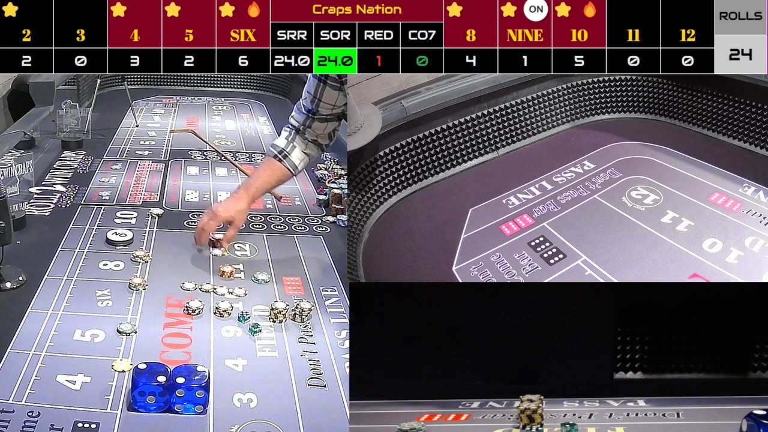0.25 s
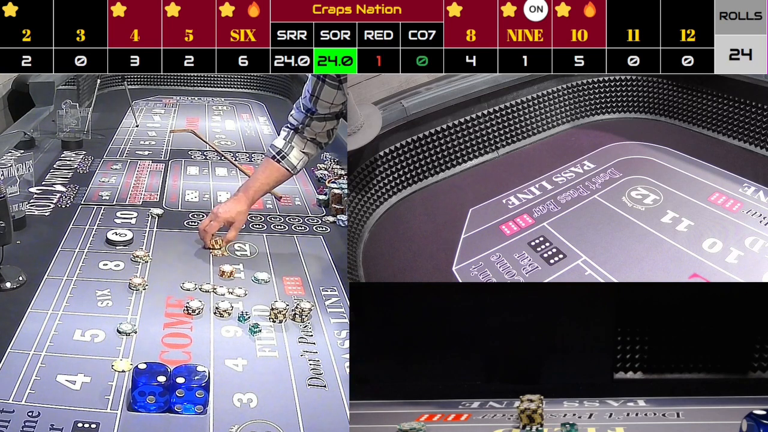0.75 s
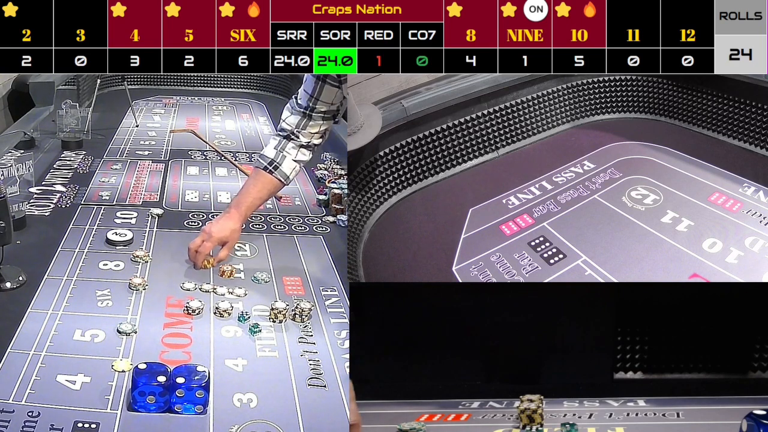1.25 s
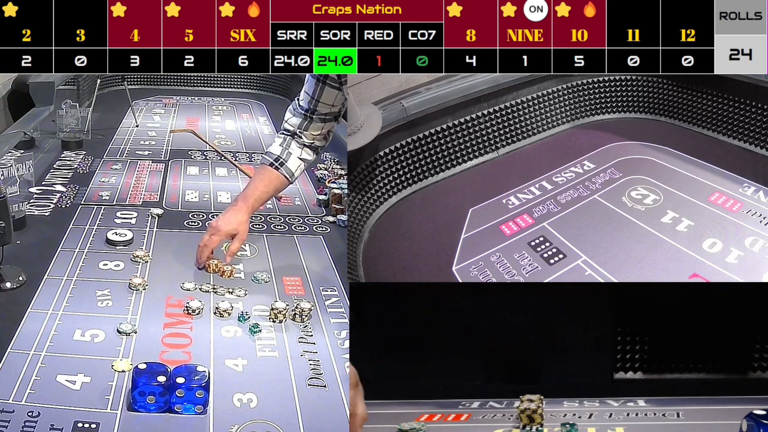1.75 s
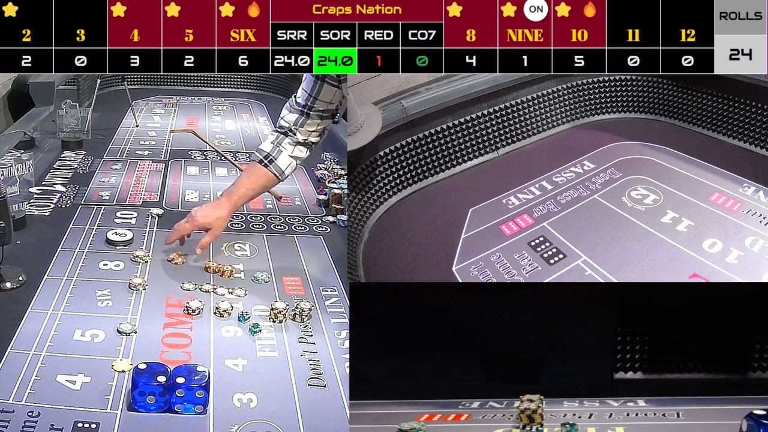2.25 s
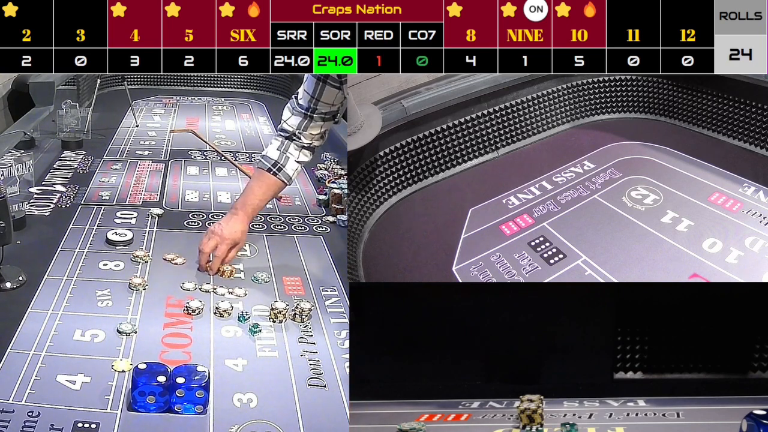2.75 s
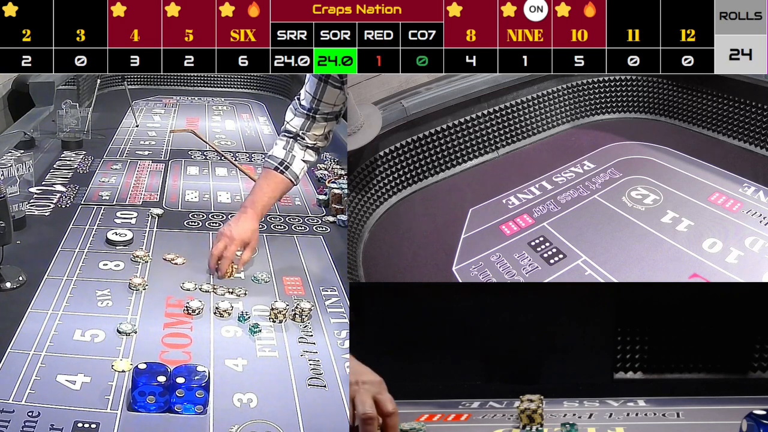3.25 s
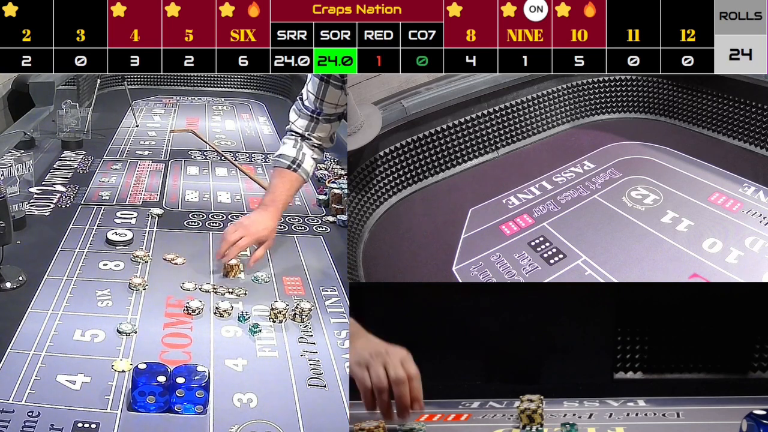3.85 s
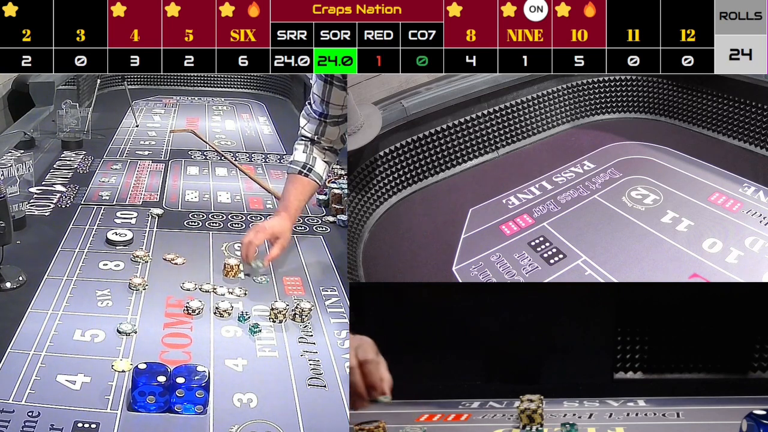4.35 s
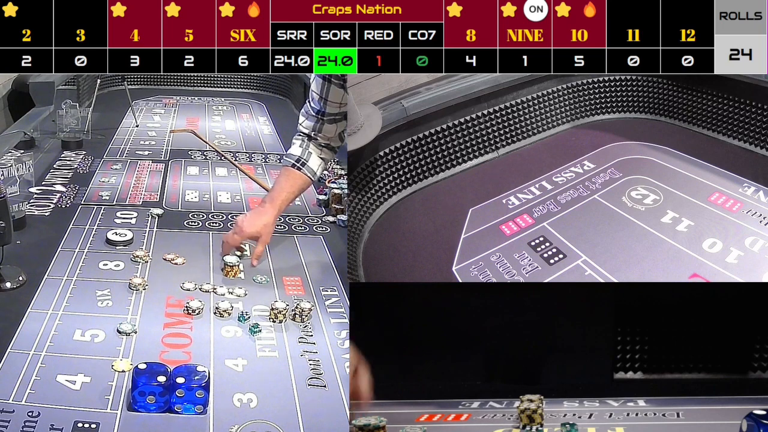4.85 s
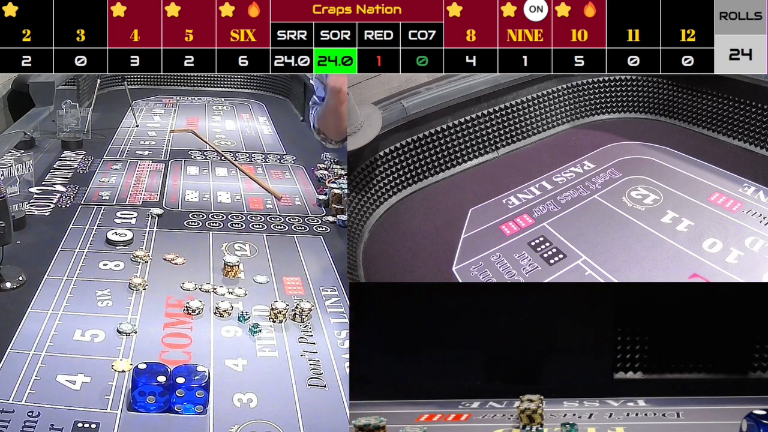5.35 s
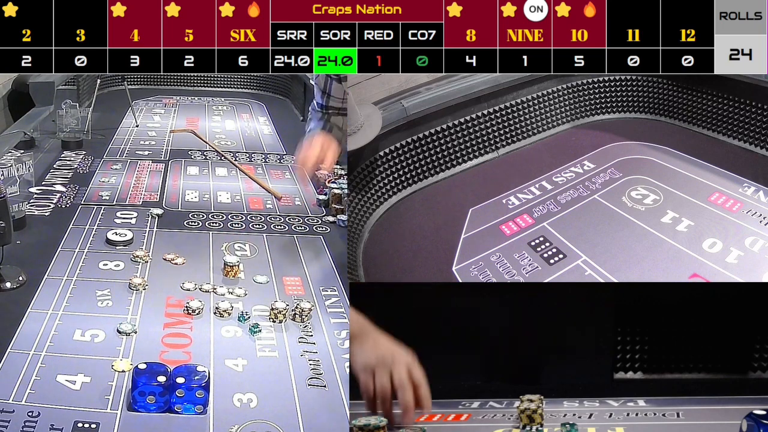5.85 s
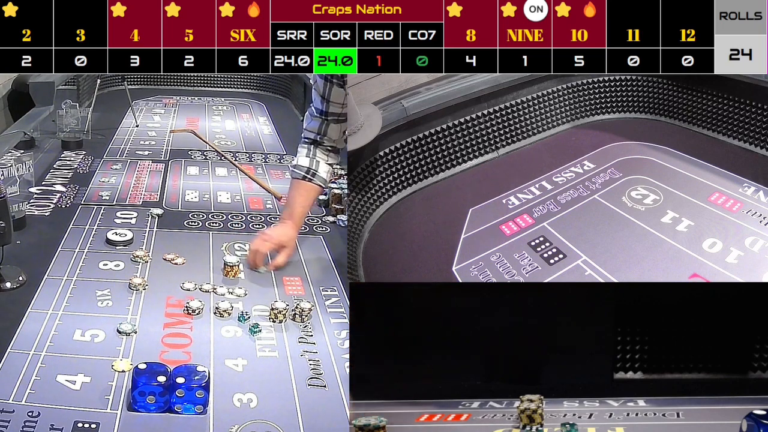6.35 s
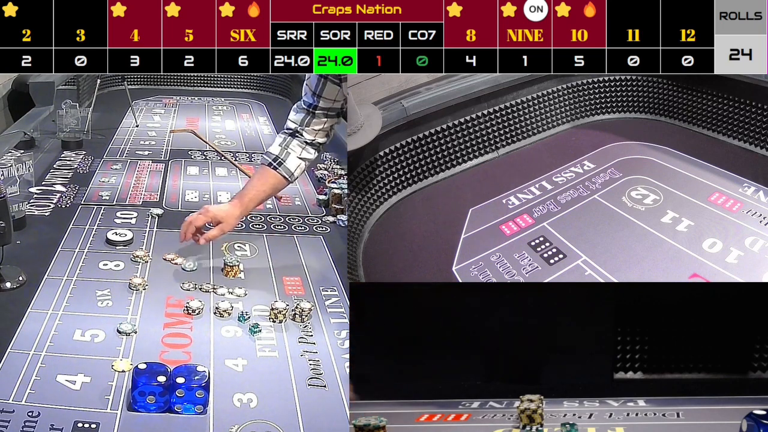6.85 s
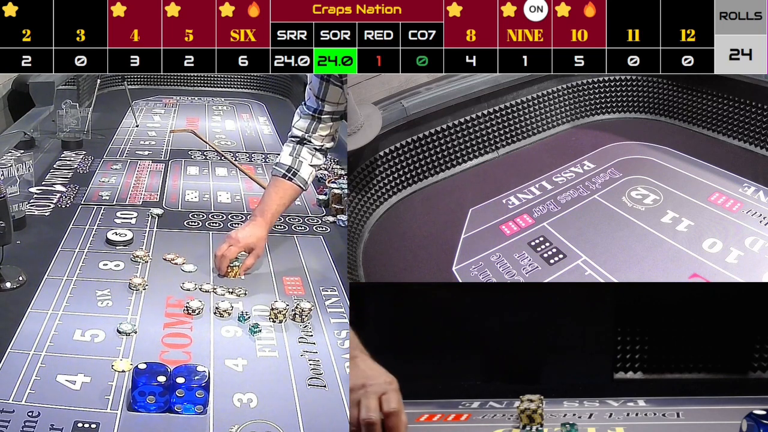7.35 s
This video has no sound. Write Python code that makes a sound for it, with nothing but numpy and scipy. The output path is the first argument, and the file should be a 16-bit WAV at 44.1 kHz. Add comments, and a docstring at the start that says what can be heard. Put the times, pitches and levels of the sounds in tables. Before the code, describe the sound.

Sparse chip handling indoors: crisp clatters, dull finger taps, soft thumps on a padded table, faint cloth brushing, and quiet ventilation hum.

```python
"""Casino chips on a felt table

A dealer picks up casino chips and stacks them on a felt-covered gaming table, indoors. Chips meet in quick runs
of hard contacts: noise cracks, damped chip modes and a rattle, and a short tonal chirp flares with them. Stacks
set down thump the hollow table, made of resonances driven by short pushes. Shaped noise gives the brush of hand
and chips on felt; noise and tones give the ventilation. Contacts carry a small room echo."""
import sys
import numpy as np
from scipy import signal
from scipy.fft import rfft, irfft, next_fast_len
from scipy.io import wavfile
from scipy.ndimage import map_coordinates

SR = 44100
rng = np.random.default_rng(int(sys.argv[2]) if len(sys.argv) > 2 else 0)


def bounce(signal):
    """Save signal as a 16-bit WAV file at the path given by the first command-line argument."""
    frames = np.transpose(np.atleast_2d(signal))
    limited = np.clip(frames, -1, 1)
    pcm = np.round(limited * 32767).astype(np.int16)
    wavfile.write(sys.argv[1], SR, pcm)


N = 335158  # length in samples

# runs of chip against chip: start_s, contacts, first_gap_s, loss_per_contact_db, crack_db,
# grip (0 loose - 1 held), chip_pitch_hz, chirp_db
CLATTERS = [(0.7148, 3, 0.0038, 2, -35, 0.09, 6320, -42),
            (0.7223, 6, 0.0025, 1.5, -17.5, 0.46, 6000, -23.5), (.776, 2, 0.0011, 1.5, -34, 0.8, 6900, -42),
            (1.8247, 1, 0.0012, 0, -35.5, 0.58, 6000, -45), (2.083, 3, 0.0005, 9, -19, 0, 6200, -43),
            (2.162, 2, 0.016, -5.5, -43, 0.25, 6050, -53), (2.1826, 2, 0.011, 11.5, -26, 0.21, 6330, -28.5),
            (2.2147, 3, .0236, 4.5, -39, 0.36, 6370, -43), (3.0943, 1, 0, 0, -32, 0.32, 6080, -4),
            (3.104, 3, .006, 1, -35.5, 0.1, 5620, -21), (3.1786, 1, 0, 0, -41, 0.94, 6140, -51),
            (4.4988, 1, 0, 0, -24.5, 0.07, 5900, -40), (4.5023, 3, .0036, 4.5, -11, 0.26, 5890, -31.5),
            (4.521, 2, 0.034, 2, -34.5, 0.15, 5770, -44.5)]
# modes of a loose chip: multiple_of_pitch, level_db, t60_s
CHIP_MODES = [(.86, -6.5, .012), (.945, -2.5, .013), (1, -0.5, 0.017), (1.05, -1, .014), (1.57, -9, .009),
              (1.68, -12, .01), (1.98, -10, 0.0075), (2.07, -13.5, 0.013), (2.15, -14, .011),
              (2.45, -19.5, .007)]
# steady lines of a short tonal chirp: pitch_hz, level_db, t60_s
CHIRP_LINES = [(1153, -6.5, 0.12), (1562, -4, 0.15), (2040, -2, 0.16), (2510, -5, 0.36), (2690, -2.5, .2),
               (2793, 0.5, 0.12), (4210, -1, .2), (4435, -2.5, 0.4), (4590, 3, .15), (4750, 1, 0.26),
               (5294, 2, 0.45), (5265, 1.5, 0.078), (5350, -1, 0.15), (5950, -3.5, 0.18),
               (6300, -11.5, 0.21), (10300, -8.5, 0.25), (12200, -9, .2), (13420, -5.5, 0.18)]
# colour of the instant of contact: frequency_hz, level_db
CRACK_COLOUR = [(200, -12.5), (550, -10.5), (1100, -2.5), (1700, -2), (3600, 3), (6200, 2), (7500, -7),
                (10000, -3.5), (13000, -10), (16000, -8)]
# colour of a held chip's dull tap: frequency_hz, level_db
TAP_COLOUR = [(250, -14), (700, -7), (1200, 2.5), (1900, -1), (2700, -0.5), (3600, -10), (5500, -14.5),
              (7500, -24), (16000, -28)]
# colour of the rattle after a contact: frequency_hz, level_db
RATTLE_COLOUR = [(300, -12), (1000, -1), (2600, 0.5), (3800, -2.5), (5600, 2), (7200, -10.5), (10500, -8.5),
                 (13500, -8.5), (16000, -18.5)]
# fingers taking hold of chips: start_s, tap_db, scuff_db, scuff_length_s
GRIPS = [(0.3203, -49.5, -60.5, 0.036), (0.358, -40.5, -63.5, 0.029), (0.372, -42, -58, 0.035),
         (0.452, -64, -65, .12), (1.298, -35.5, -65, .03), (1.677, -57, -65, 0.036),
         (1.731, -62.5, -68.5, 0.028), (1.796, -56, -63, 0.033), (2.066, -32, -55.5, 0.016),
         (2.628, -47, -64, 0.13), (3.987, -58, -68, 0.05), (4.024, -52, -71, 0.046),
         (4.766, -56, -63, 0.18), (5.455, -61, -65, 0.031), (6.059, -50.5, -62, 0.13),
         (6.725, -41, -58, 0.033)]
# colour of chips scuffing in the fingers: frequency_hz, level_db
SCUFF_COLOUR = [(300, 1), (800, 4.5), (1600, 0.5), (2700, -3), (4500, -6), (7000, -12), (16000, -15)]
# blows on the table: start_s, boom_db, brightness_db_per_octave, hard_knock_db
BLOWS = [(0.366, -38, -1.5, -65), (0.744, -26.5, 1.5, -38.5), (1.74, -44.5, -6.5, -66),
         (2.076, -28.5, -0.5, -14.5), (2.183, -40, -2.5, -35.5), (2.61, -40.5, -3.5, -69.5),
         (3.107, -26, 1, -41.5), (3.98, -47, -3.5, -78), (4.511, -29, 0.5, -48),
         (4.687, -29.5, -0.5, -73.5), (5.945, -33.5, 1, -62), (6.7252, -30.5, 2, -18.5),
         (6.826, -37, 3, -52.5), (7.209, -46, -3.5, -58.5)]
# resonances of the hollow table bed: frequency_hz, width_hz, level_db
BED_RESONANCES = [(44, 3.6, 5.5), (80, 10, -1.5), (109.3, 5.7, -1.5), (136, 7.3, -6.5), (214.7, 15, -20.5)]
# resonances of the board under the felt, struck hard: frequency_hz, width_hz, level_db
BOARD_RESONANCES = [(109, 18, 3.5), (201, 13, 2.5), (250, 30, -2.5), (344, 56, -6.5), (416, 53, -4),
                    (502, 39, -12.5), (602, 29, -20), (696.8, 90, -14), (803, 75, -17.5), (1090, 120, -21),
                    (1700, 400, -30.5)]
# sweeps over the felt: firmest_s, swell_s, fade_s, level_db
SWEEPS = [(0.918, 0.16, 0.36, -62.5), (2.701, 0.24, .07, -69.5), (3.39, .11, 0.15, -70.5),
          (4.752, 0.13, 0.55, -76), (6.3, 0.37, 0.41, -73), (7.36, .28, .16, -64.5)]
# colour of rubbed cloth: frequency_hz, level_db
FELT_COLOUR = [(200, -12.5), (500, -2.5), (1200, -2.5), (2000, -1), (3500, -3.5), (5500, -7.5),
               (8000, -13.5), (12000, -10.5), (16000, -19)]
# colour of the ventilation's air noise: frequency_hz, level_db
AIR_COLOUR = [(18, -4), (30, -5.5), (45, -4), (62, -2), (80, -2), (100, -10), (125, -6), (150, -18),
              (205, -15), (350, -28.5), (500, -33.5), (1100, -38.5), (2200, -46), (16000, -46)]
# fan and mains tones: frequency_hz, rms_db
HUM_TONES = [(60, -64.5), (120, -57.5), (208, -75.5)]
# decay of the room tail: frequency_hz, t60_s
ROOM_DECAY = [(100, 0.48), (400, .3), (2000, 0.13), (4500, .27), (6000, 0.25), (8000, 0.19), (16000, .25)]

GAP_GROWTH = 1.2  # each gap over the one before, as the chips settle
PITCH_SCATTER = 0.021  # spread of chip pitches, as a fraction
RING_DB, GRIP_DAMPS_DB = 15, 35  # ring of a loose chip over its crack; what a full grip takes from it
DULL_DB, GRIP_DULLS_DB = -11.5, 18  # dull tap against the crack; what a full grip adds to it
CHIRP_RISE_S, CHIRP_FADE_S = 0.0067, 0.022  # the chirp swells, then fades within tens of milliseconds
RATTLE_DB, RATTLE_RISE_S, RATTLE_T60_S = -16.5, 0.018, 0.21  # rattle: level against the tonal chirp, swell, decay
SCUFF_LAG_S = 0.005  # the scuff is strongest just after the tap
TICKS_PER_S, TICKS_DB = 70, -5  # rims ticking inside a scuff; their level against the rubbing
TOUCH_LEAD_S, TOUCH_BOOM_DB, TOUCH_KNOCK_DB = 0.0125, -5, -18  # light touch against the full weight
SHUDDER_T60_S, LINGER_DB, LINGER_T60_S = 0.23, -9, 0.9  # the frame's shudder and its slow remainder
TOP_HZ = 16000  # band limit


def chips():
    """Each contact cracks and rings two chips as far as the grip allows; with it come a short tonal chirp and a
    rattle."""
    track, t = np.zeros(N), np.arange(SR // 4) / SR
    brief = t[:len(t) // 4]
    # the chirp swells, then fades within tens of milliseconds
    swelling = 1 - 0.5 * np.exp(-brief / CHIRP_RISE_S)
    fading = np.exp(-(brief / CHIRP_FADE_S) ** 2)
    rattling = fade(t, RATTLE_T60_S) * (1 - np.exp(-t / RATTLE_RISE_S)) ** 2
    for start, count, gap, loss_db, crack_db, grip, chip_hz, chirp_db in CLATTERS:
        cracks, rings, chirps = np.zeros((3, len(t)))
        dull_gain = amp(DULL_DB + GRIP_DULLS_DB * grip)
        ring_gain = amp(RING_DB - GRIP_DAMPS_DB * grip)
        delay = 0
        for k in range(round(count)):
            strength = amp(-loss_db * k)  # a negative loss makes the run grow
            snap = rng.standard_normal(len(brief)) * fade(brief, 0.012)
            crack = burst(coloured(snap, CRACK_COLOUR), ms=1)
            pair_hz = chip_hz * (1 + PITCH_SCATTER * rng.standard_normal(2))
            pair = sum(ring(CHIP_MODES, brief, scatter_db=0.9, detune=0.0023, pitch=hz) for hz in pair_hz)
            chirp = swelling * fading * ring(CHIRP_LINES, brief, scatter_db=1.5, detune=0.00031)
            rattle = coloured(rng.standard_normal(len(t)) * rattling, RATTLE_COLOUR)
            add(cracks, delay, strength * (crack + dull_gain * tap(brief)))
            add(rings, delay, strength * ring_gain * burst(pair, ms=1))
            add(chirps, delay, strength * burst(chirp, ms=1))
            add(chirps, delay, strength * amp(RATTLE_DB) * burst(rattle, ms=1))
            delay += gap * GAP_GROWTH ** k
        cracks = echoed(cracks, near_db=-6.5, near_t60=0.05, wall_db=-19.5, room_db=-11)
        rings = echoed(rings, near_db=-12, near_t60=0.074, wall_db=-26, room_db=-14)
        add(track, start, amp(crack_db) * cracks)
        add(track, start, amp(crack_db) * rings)
        add(track, start, amp(chirp_db) * chirps)
    return track


def fingers():
    """Fingers damp the chips they take: a dull tap and a grainy scuff with small ticks, none of which ring."""
    taps, scuffs, t = np.zeros(N), np.zeros(N), np.arange(SR // 16) / SR
    # the rims catch and slip hundreds of times a second
    rubbing = unit(noise(SCUFF_COLOUR) * amp(1.3 * wobble(500)))
    clicks = (rng.random(N) < TICKS_PER_S / SR) * rng.uniform(0.5, 1, N)
    ticks = unit(coloured(clicks, TAP_COLOUR))
    for start, tap_db, scuff_db, length in GRIPS:
        heard_tap = echoed(tap(t), near_db=-8.5, near_t60=0.05, wall_db=-21.5, room_db=-16.5)
        add(taps, start, amp(tap_db) * heard_tap)
        scuffs += amp(scuff_db) * swell(start + SCUFF_LAG_S, length / 2, length / 2)
    return taps + scuffs * (rubbing + amp(TICKS_DB) * ticks)


def tap(t):
    """The dull tick of a chip that the fingers keep from ringing: a click and brief noise, coloured."""
    contact = rng.standard_normal(len(t)) * fade(t, 0.007) + 3 * signal.unit_impulse(len(t))
    return burst(coloured(contact, TAP_COLOUR), ms=1)


def table():
    """A light touch, then the full weight: each booms in the hollow bed and knocks on the felted board."""
    track, t = np.zeros(N), np.arange(3 * SR // 4) / SR
    # the felt softens the knock; the heavy bed follows only slow pushes
    cushion = signal.butter(2, 1350, fs=SR, output="sos")
    inertia = signal.butter(2, 380, fs=SR, output="sos")
    # the push comes back from the frame and legs as a dying shudder
    dying = fade(t, SHUDDER_T60_S) + amp(LINGER_DB) * fade(t, LINGER_T60_S)
    for start, boom_db, tilt_db, knock_db in BLOWS:
        push = echoed(signal.unit_impulse(SR // 100), near_db=-2, near_t60=0.04, wall_db=-17.5, room_db=-7)
        board = resonant(signal.sosfilt(cushion, push), tilted(BOARD_RESONANCES, tilt_db))
        knock = amp(knock_db) * burst(board, ms=10)
        touch = (start - TOUCH_LEAD_S, TOUCH_BOOM_DB, TOUCH_KNOCK_DB)
        full_weight = (start, 0, 0)
        for when, bed_db, board_db in [touch, full_weight]:
            shudder = rng.standard_normal(len(t)) * dying
            shudder = shudder / np.linalg.norm(shudder)
            shove = signal.sosfilt(inertia, signal.unit_impulse(len(t)) + shudder)
            boom = burst(resonant(shove, tilted(BED_RESONANCES, tilt_db)), ms=100)
            add(track, when, amp(boom_db + bed_db) * boom)
            add(track, when, amp(board_db) * knock)
    return track


def tilted(modes, db_per_octave):
    """The place and hardness of a blow decide which resonances it favours."""
    lowest_hz = modes[0][0]
    return [(hz, width, db + db_per_octave * np.log2(hz / lowest_hz)) for hz, width, db in modes]


def felt():
    """Hand and chips sweep the cloth with uneven pressure; between sweeps the sleeve barely rustles."""
    sweeps = sum(amp(db) * swell(firmest, rise, fall) for firmest, rise, fall, db in SWEEPS)
    pressure = amp(-82) + sweeps
    return pressure * amp(0.9 * wobble(54)) * noise(FELT_COLOUR)


def ventilation():
    """Low rumble and faint hiss, with slightly unsteady fan and mains tones."""
    t = np.arange(N) / SR
    hum = sum(amp(db) * unit(np.sin(2 * np.pi * hz * t + 0.22 * wobble(1.9))) for hz, db in HUM_TONES)
    # a narrow midrange whirr comes and goes
    whirr = unit(resonant(rng.standard_normal(N), [(579, 45, 0)]) * amp(3.1 * wobble(3.4)))
    return hum + amp(-81) * whirr + amp(-54.5) * noise(AIR_COLOUR)


def echoed(x, near_db, near_t60, wall_db, room_db):
    """x with quick scatter off the table's rails, a smeared answer from the walls and a room tail."""
    t = np.arange(SR // 3) / SR
    # the tail decays at its own rate in each frequency band
    hz, frames, bands = signal.stft(rng.standard_normal(len(t)), SR, nperseg=256)
    bands = bands * fade(frames, along(ROOM_DECAY, hz)[:, None])
    tail = signal.istft(bands, SR, nperseg=256)[1][:len(t)]
    tail = tail * (1 - np.exp(-t / 0.0027))
    near = rng.standard_normal(len(t)) * fade(t, near_t60) * (1 - np.exp(-t / 0.00022))
    wall = rng.standard_normal(len(t)) * np.exp(-np.abs(t - 0.043) / 0.004)
    parts = [(near_db, near), (wall_db, wall), (room_db, tail)]
    answer = sum(amp(db) * part / np.linalg.norm(part) for db, part in parts)
    answer[0] += 1  # the direct sound
    return signal.fftconvolve(x, answer)


def ring(modes, t, scatter_db, detune, pitch=1):
    """Damped modes, scaled by pitch; strengths and frequencies vary at random from one ring to the next."""
    hz, db, t60 = np.transpose(modes)[:, :, None]
    strength, shift, sign = rng.standard_normal((3, len(modes), 1))
    mode_hz = pitch * hz * (1 + detune * shift)
    waves = np.sign(sign) * np.sin(2 * np.pi * mode_hz * t)
    return np.sum(amp(db + scatter_db * strength) * fade(t, t60) * waves, axis=0)


def resonant(x, modes):
    """x through a body with the given (Hz, width Hz, dB) resonances, alternating in polarity."""
    def response(f):
        total = 0
        for k, (centre, width, db) in enumerate(modes):
            damping = 1j * f * width
            total = total + (-1) ** k * amp(db) * damping / (centre ** 2 - f ** 2 + damping)
        return total
    return filtered(x, response)


def noise(spectrum):
    """Steady coloured noise of rms 1."""
    return unit(filtered(rng.standard_normal(N), lambda hz: amp(along(spectrum, hz))))


def coloured(x, spectrum, size=2048):
    """x through a causal minimum-phase filter with the given spectrum, so attacks stay sharp."""
    cepstrum = irfft(np.log(amp(along(spectrum, np.fft.rfftfreq(size, 1 / SR)))))
    # folding the cepstrum forward makes the filter minimum phase
    cepstrum[1:size // 2] *= 2
    cepstrum[size // 2 + 1:] = 0
    return signal.fftconvolve(x, irfft(np.exp(rfft(cepstrum))))[:len(x)]


def filtered(x, response):
    """x times a response of frequency."""
    m = next_fast_len(len(x) + SR // 2)
    return irfft(rfft(x, m) * response(np.fft.rfftfreq(m, 1 / SR)), m)[:len(x)]


def along(points, hz):
    """(Hz, value) points interpolated on a log frequency axis."""
    f, v = np.transpose(points)
    return np.interp(np.log(hz + 1), np.log(f + 1), v)


def swell(s, rise, fall):
    """A smooth hump that peaks at s, with rise and fall times in seconds."""
    t = np.arange(N) / SR - s
    return np.exp(-(t / np.where(t < 0, rise, fall)) ** 2)


def wobble(rate):
    """A smooth random curve, rate knots a second."""
    return map_coordinates(rng.standard_normal(int(N * rate / SR) + 4), [np.arange(N) * rate / SR])


def fade(t, t60):
    """A decay of 60 dB in t60 seconds."""
    return 10 ** (-3 * t / t60)


def amp(db):
    """Decibels to linear gain."""
    return 10 ** (np.asarray(db) / 20)


def unit(x):
    """x at rms 1."""
    return x / np.sqrt(np.mean(x ** 2) + 1e-20)


def burst(x, ms):
    """x with the energy of ms milliseconds at rms 1."""
    return unit(x) * np.sqrt(ms * SR / 1000 / len(x))


def add(track, s, x):
    """Mix x into the track at time s in seconds."""
    part = track[round(s * SR):][:len(x)]
    part += x[:len(part)]


def scene():
    """Chips, hands and table over the ventilation, at one microphone."""
    return (chips() + fingers() + table() + felt() + ventilation())[None]


def record(dry):
    """The microphone clips at full scale; a steep low-pass then cuts the top of the band."""
    clipped = np.clip(dry[0], -1, 1)
    return filtered(clipped, lambda hz: 1 / (1 + (hz / TOP_HZ) ** 120))[None]


dry = scene()
out = record(dry)
bounce(out)
```